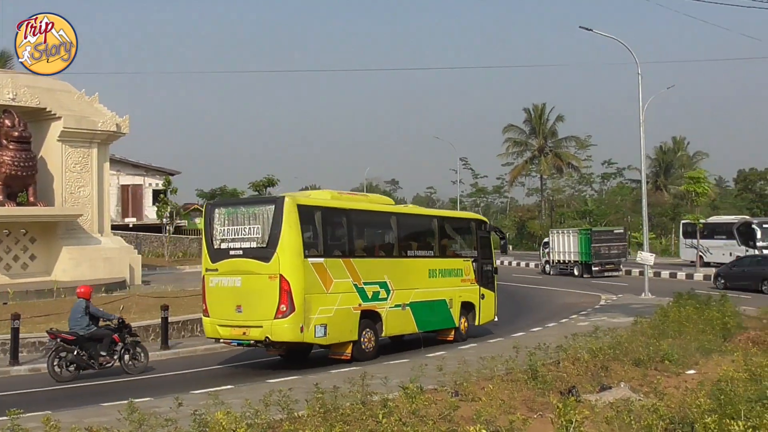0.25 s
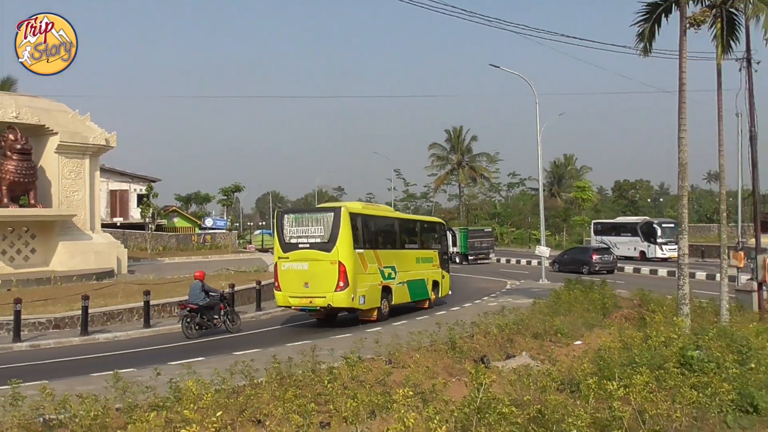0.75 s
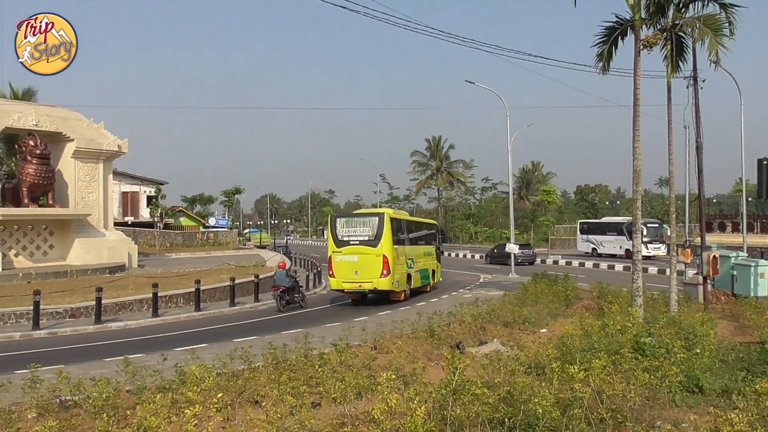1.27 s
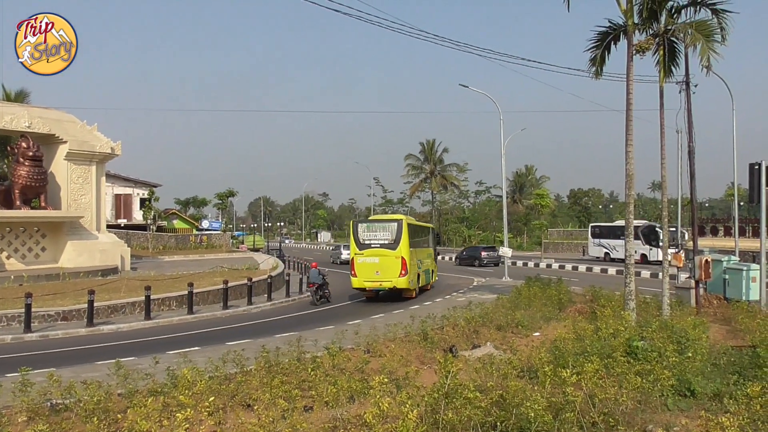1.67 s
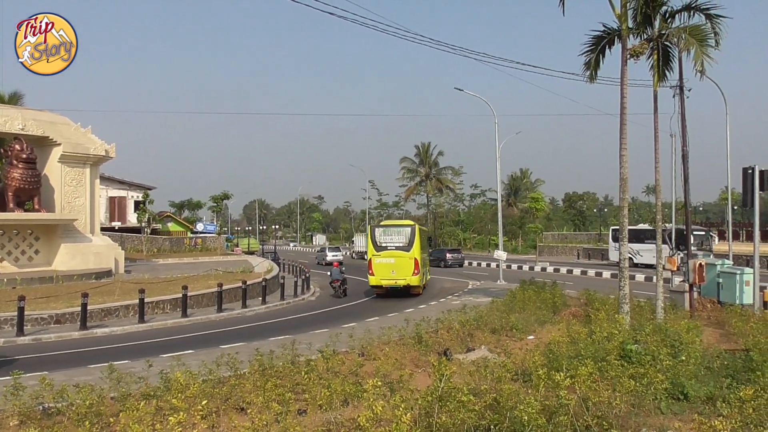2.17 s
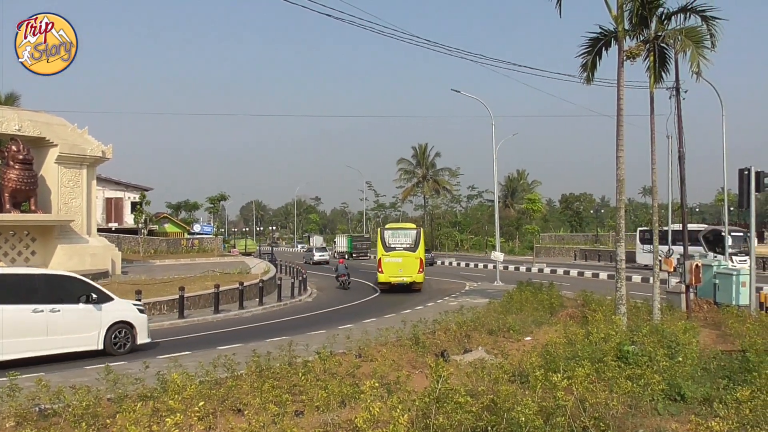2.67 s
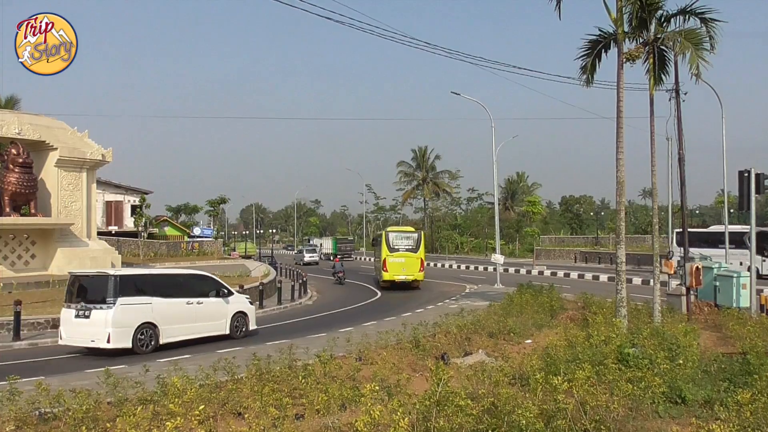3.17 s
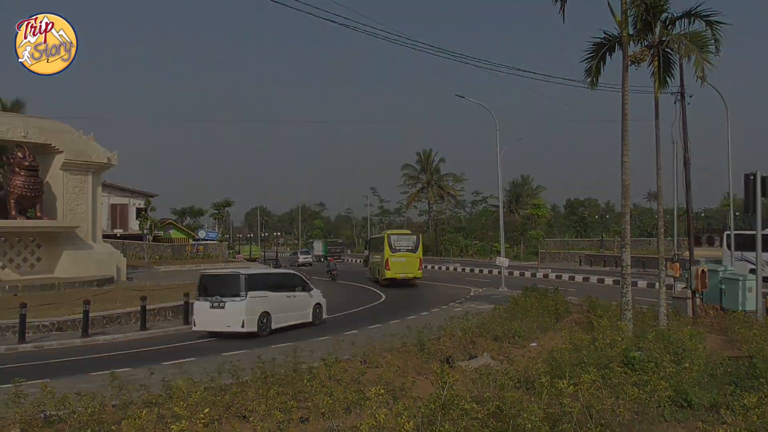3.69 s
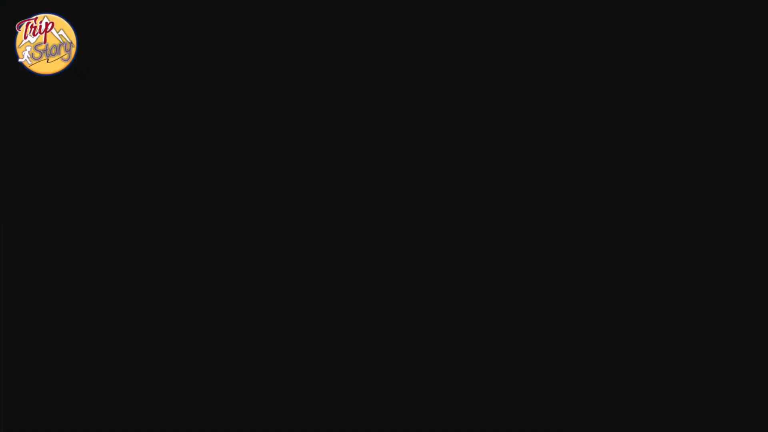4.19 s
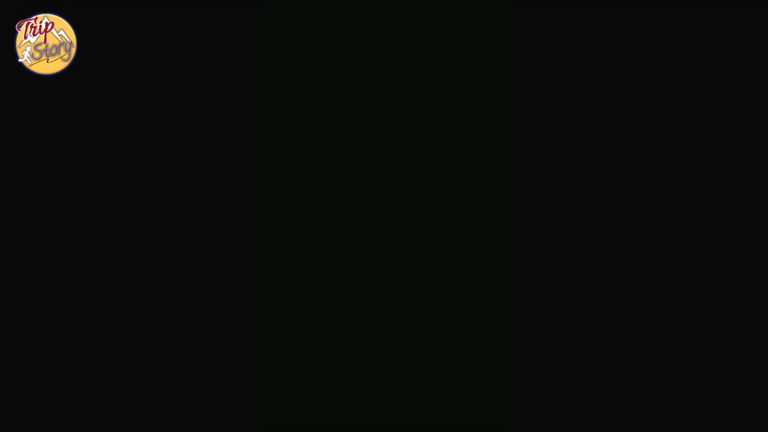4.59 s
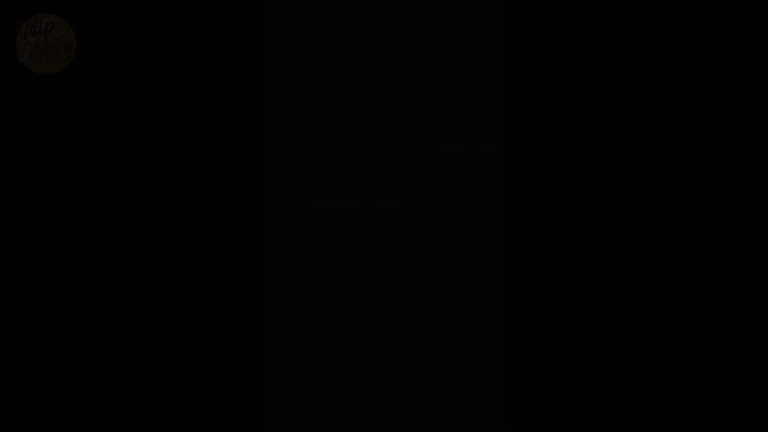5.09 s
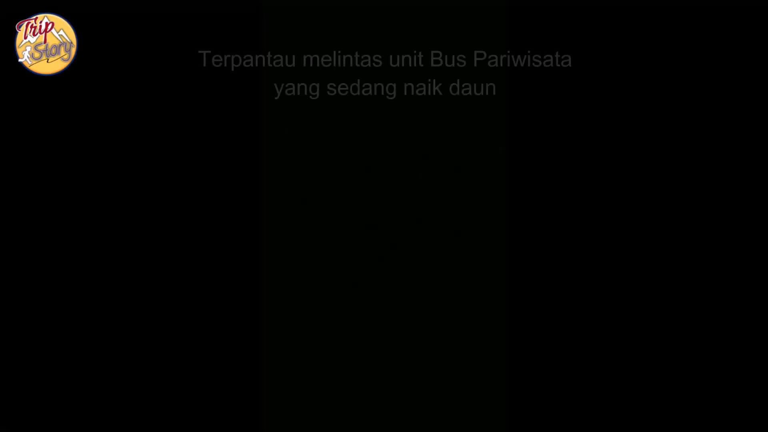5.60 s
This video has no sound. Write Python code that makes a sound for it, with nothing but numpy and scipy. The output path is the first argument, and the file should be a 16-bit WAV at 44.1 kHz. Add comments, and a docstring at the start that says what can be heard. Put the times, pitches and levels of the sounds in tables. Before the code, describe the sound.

At a roadside junction, a diesel bus pulls away in a steady roar of tyres and distant engines. Its gears whine, its cooling air hisses, an exhaust growl sinks and loose metal chinks lightly. A second diesel then speeds up close by while a shrill hiss swells and pulses. Another engine hums and a vehicle approaches before everything fades to silence. The traffic spreads in stereo.

```python
"""A diesel bus pulls away round a junction in a steady roar of tyres, far engines and air.
Its gears whine and its cooling air hisses; an exhaust growl sinks and small metal parts chink.
From 2 s a second diesel speeds up close by, while a shrill hiss swells and then pulses.
Another engine hums, a vehicle draws near, and from 4.8 s everything fades to silence."""
import sys
import numpy as np
from scipy import signal
from scipy.fft import rfft, irfft, next_fast_len
from scipy.io import wavfile
from scipy.ndimage import uniform_filter1d, map_coordinates

SR = 44100
rng = np.random.default_rng(int(sys.argv[2]) if len(sys.argv) > 2 else 0)


def master_out(mix):
    """Clip the mix to full scale and print it as 16-bit PCM to the path in sys.argv[1]."""
    frames = np.transpose(np.atleast_2d(mix))
    ceiling = np.clip(frames, -1, 1)
    pcm = np.round(ceiling * 32767).astype(np.int16)
    wavfile.write(sys.argv[1], SR, pcm)


N = 257981
TIME_S = np.arange(N) / SR


def amp(db):
    """Gain of a level in dB."""
    return 10 ** (np.asarray(db) / 20)


def along(points, hz):
    """(Hz, value) points interpolated on a log axis."""
    knots_hz, values = np.transpose(points)
    return np.interp(np.log(hz + 1), np.log(knots_hz + 1), values)


def curves(rows):
    """Each column after the time, per sample; end values hold."""
    knots_s, *columns = np.transpose(rows)
    return [np.interp(TIME_S, knots_s, column) for column in columns]


def during(rows, ease_s):
    """1 over a table's time span, with ramps outside it."""
    return np.clip(np.minimum(TIME_S - rows[0][0], rows[-1][0] - TIME_S) / ease_s + 1, 0, 1)


def bump(at_s, width_s):
    """Bell curve in time, peak 1."""
    return np.exp(-.5 * ((TIME_S - at_s) / width_s) ** 2)


def wobble(rate_hz):
    """Smooth random curve, rate_hz knots a second."""
    knots = rng.standard_normal(int(N * rate_hz / SR) + 4)
    return map_coordinates(knots, [TIME_S * rate_hz])


def filtered(x, response):
    """x through a frequency response."""
    size = next_fast_len(N + 8192)
    return irfft(rfft(x, size) * response(np.fft.rfftfreq(size, 1 / SR)), size)[..., :N]


def panned(x, pan_db):
    """Left louder than right by pan_db."""
    return x * amp(np.outer([.5, -.5], pan_db))


def phase_pair(lead_rad):
    """Stereo phasors, left ahead by lead_rad."""
    return np.exp(1j * np.outer([.5, -.5], lead_rad))


def shifted(pair, lead_rad, shift_hz=0):
    """All frequencies moved by shift_hz, left ahead by lead_rad."""
    analytic = signal.hilbert(pair, next_fast_len(N))[:, :N]
    carrier = np.exp(2j * np.pi * np.cumsum(np.broadcast_to(shift_hz, N)) / SR)
    return np.real(analytic * carrier * phase_pair(lead_rad))


def rush(spectrum, coherence, patchy_db):
    """Stereo noise, mid rms 1, with random gain patches in time and frequency."""
    cells = signal.stft(rng.standard_normal((2, N)), nperseg=1024)[2]
    patches = uniform_filter1d(rng.standard_normal(cells.shape[1:]), size=5, axis=0)
    patches = uniform_filter1d(patches, size=8, axis=1)
    patches /= np.sqrt(np.mean(patches ** 2))
    pair = signal.istft(cells * amp(patchy_db * patches), nperseg=1024)[1][:, :N]

    def mid_side(hz):
        angle = np.arccos(along(coherence, hz)) / 2
        return amp(along(spectrum, hz)) * [np.cos(angle), np.sin(angle)]

    mid, side = filtered(pair, mid_side)
    return np.array([mid + side, mid - side]) / np.sqrt(np.mean(mid ** 2))


def tone(hz, db, blur_hz, waver_db):
    """Sine shaken in pitch and level by uneven running and moving air."""
    phase = 2 * np.pi * np.cumsum(hz + blur_hz * wobble(25)) / SR
    return np.sqrt(2) * amp(db + waver_db * wobble(18)) * np.sin(phase)


def exhaust(rows, orders_db, blur_hz, waver_db):
    """Exhaust tones at multiples of a rate; rows are (time [s], rate [Hz], level [dB])."""
    hz, db = curves(rows)
    tones = (tone(k * hz, db + order_db, k * blur_hz, waver_db)
             for k, order_db in enumerate(orders_db, 1))
    return during(rows, ease_s=.19) * sum(tones)


def bus_lift_db(start_db, decay_s=1.2):
    """Extra level that decays as the bus leaves, plus slow random swells."""
    return start_db * np.exp(-TIME_S / decay_s) + .5 * wobble(5)


# Left-right likeness of the low roar (frequency [Hz], coherence [0..1])
ROAR_COHERENCE = [(60, 0.99), (130, 0.99), (290, 0.91), (640, 0.8), (1410, 0.35), (3100, 0.24),
                  (6820, 0.15), (15000, 0.25)]
# Rumble spectrum (frequency [Hz], relative density [dB])
RUMBLE_SPECTRUM = [(53, -33.5), (90, -8), (167, 0.5), (230, 0), (307, -0.5), (480, -9), (620, -34),
                   (1060, -120)]
# Rumble swell (time [s], gain [dB])
RUMBLE_GAIN = [(0, 0.5), (1.5, 1.5), (2.2, -1), (3.3, 0), (4.3, 1.5), (4.7, -2), (5.2, -0.5)]
def rumble(level_db=-21.5):
    """Far engines; their firing makes the noise lumpy."""
    gain = amp(level_db + curves(RUMBLE_GAIN)[0] + .53 * wobble(45))
    return gain * rush(RUMBLE_SPECTRUM, ROAR_COHERENCE, patchy_db=.5)


# Tyre spectrum (frequency [Hz], relative density [dB])
TYRE_SPECTRUM = [(250, -27), (420, -3), (472, -3.5), (587, 0), (679, -0.5), (961, -7), (1330, -10),
                 (1800, -22.5), (2340, -48), (3960, -120)]
# Tyre direction (time [s], left lead [rad])
TYRE_LEAD = [(0, 0.65), (.9, 0.9), (1.4, -0.22), (2.2, -0.51), (3.8, -0.12), (4.3, -0.2)]
def tyres(level_db=-26):
    """Tyre roar crossing the scene."""
    gain = amp(level_db + bus_lift_db(3) + .36 * wobble(40))
    return gain * shifted(rush(TYRE_SPECTRUM, ROAR_COHERENCE, patchy_db=.5), curves(TYRE_LEAD)[0])


# Road hiss spectrum (frequency [Hz], relative density [dB])
ROAD_SPECTRUM = [(1000, -5.5), (1700, -11.5), (1800, -5), (2170, 1), (2680, -6.5), (3870, -6.5),
                 (6200, -17), (8060, -39), (13600, -120)]
def road_hiss(level_db=-42.5, lull_db=-1.5):
    """Road hiss, sinking between the bus and the second diesel."""
    db = level_db + bus_lift_db(1.5) + lull_db * bump(at_s=1.7, width_s=.4) + .62 * wobble(15)
    return amp(db) * rush(ROAD_SPECTRUM, [(2000, .32), (5000, .28)], patchy_db=.76)


# Air fizz spectrum (frequency [Hz], relative density [dB])
FIZZ_SPECTRUM = [(3410, -25.5), (5800, -3), (10100, 0), (13100, -15), (15500, -20.5)]
def air_fizz(level_db=-51):
    """High fizz of air, louder while the bus is close."""
    coherence = [(7000, .3), (9000, .13), (10500, .29), (12500, .5), (15000, .35)]
    gain = amp(level_db + bus_lift_db(4.5) + .3 * wobble(13))
    return gain * rush(FIZZ_SPECTRUM, coherence, patchy_db=1)


# Cooling air envelope (time [s], level [dB])
COOLING_LEVEL = [(0, -56), (.8, -45), (2, -65)]
# Cooling air spectrum (frequency [Hz], relative density [dB])
COOLING_SPECTRUM = [(1900, -24), (2600, 0), (3300, 0), (4200, -1), (5000, -6), (5700, -22), (8000, -120)]
def cooling_air():
    """The bus's cooling air hisses up and recedes."""
    return amp(curves(COOLING_LEVEL)[0]) * rush(COOLING_SPECTRUM, [(4000, .45)], patchy_db=2.5)


# Roar balance (frequency [Hz], left minus right [dB])
ROAR_PAN = [(60, 3), (110, -1), (200, -0.5), (380, -1), (700, 0.5), (1290, -0.5), (2380, -1.5),
            (4400, -1.5), (8120, 3.5), (15000, -2)]
# Roar phase (frequency [Hz], left lead [rad])
ROAR_LEAD = [(300, 0), (6000, -.1), (7400, -.9), (8500, -2.8), (9500, -3.2), (10500, -4.6), (11500, -6.1),
             (15500, -6.2)]
def roar(dip_db=-2):
    """Five noise layers, spread in stereo by frequency; the level dips briefly."""
    layers = rumble() + tyres() + road_hiss() + air_fizz() + cooling_air()
    layers *= amp(dip_db * bump(at_s=4.54, width_s=.05))
    return filtered(layers, lambda hz: panned(phase_pair(along(ROAR_LEAD, hz)), along(ROAR_PAN, hz)))


# Thrum spectrum (frequency [Hz], relative density [dB])
THRUM_SPECTRUM = [(25, -31), (45, -16), (60, 3), (85, 2), (110, -12), (160, -39), (300, -120)]
def thrum(level_db=-36.5):
    """Deep wavering noise under the roar."""
    return amp(level_db + 1.8 * wobble(8)) * rush(THRUM_SPECTRUM, ROAR_COHERENCE, patchy_db=-.1)


# Bus exhaust orders 1 to 7 (level [dB])
BUS_ORDERS_DB = [-120, -40, -36.5, -32, -32.5, -36, -34]
def bus(start_hz=43.85, rise_hz_per_s=1.8, end_s=1.3):
    """The bus engine's beat quickens slightly as it draws away."""
    run = [(0, start_hz, 0), (end_s, start_hz + rise_hz_per_s * end_s, 0)]
    return exhaust(run, BUS_ORDERS_DB, blur_hz=.5, waver_db=3)


# Gear whine following road speed (time [s], pitch [Hz], level [dB])
GEAR_WHINE = [(0, 588, -32), (.8, 598, -31.5), (1.5, 581.6, -33.5), (2.0, 574.3, -29), (2.15, 593, -38),
              (2.38, 619, -31.5), (2.6, 662, -27.5), (3.0, 728, -35), (3.4, 742, -32), (3.6, 755.6, -37.5),
              (4.4, 757.6, -42.5), (4.7, 764, -29.5), (4.9, 754, -37)]
# Other vehicles' whines (start [s], length [s], first pitch [Hz], last pitch [Hz], level [dB])
SHORT_WHINES = [(0.399, .45, 669, 662, -32.5), (3.898, .45, 415, 398.4, -33)]
def gear_whines(clear_db=-28, blur_hz_per_db=.38):
    """Gear teeth sing one tone per vehicle; the weaker it is, the more its pitch blurs."""
    short_runs = [[(start_s, first_hz, db), (start_s + length_s, last_hz, db)]
                  for start_s, length_s, first_hz, last_hz, db in SHORT_WHINES]
    out = np.zeros(N)
    for run in [GEAR_WHINE] + short_runs:
        hz, db = curves(run)
        blur_hz = 3.5 + blur_hz_per_db * (clear_db - db)
        out += during(run, ease_s=.12) * tone(hz, db, blur_hz, waver_db=3.6)
    return np.array([out, np.roll(out, -2)])  # right 2 samples early


# Exhaust growl (time [s], pitch [Hz], level [dB])
GROWL_RUN = [(.95, 340, -39.5), (1.15, 305, -24), (1.55, 212, -29.5), (1.8, 178, -39.5)]
def growl():
    """A rough exhaust tone sinks as the throttle closes."""
    return exhaust(GROWL_RUN, [0], blur_hz=14, waver_db=2.2)


# Metal chinks (start [s], level [dB], pitch [Hz], length [s])
CHINK_HITS = [(1.104, -43, 10500, .035), (1.108, -56.5, 14400, .03), (1.16, -46, 10400, .018),
              (1.292, -49.5, 10400, .012), (1.42, -44.5, 8700, .012), (1.43, -42.5, 9290, .028),
              (1.525, -49, 9250, .012), (1.675, -50, 10400, 0.022), (1.95, -51, 10400, .032),
              (2.015, -54, 10400, .02)]
# Chink position (time [s], left minus right [dB])
CHINK_BALANCE = [(1.45, 9), (2, 0)]
def chinks():
    """Short thin rings of loose metal, moving from left to centre."""
    out = np.zeros(N)
    for start_s, db, hz, length_s in CHINK_HITS:
        t = np.arange(round(length_s * SR)) / SR
        envelope = amp(db) * np.sqrt(np.sin(np.pi * t / length_s))
        out[round(start_s * SR):][:len(t)] += envelope * np.sin(2 * np.pi * hz * t)
    return panned(out, curves(CHINK_BALANCE)[0])


# Shrill hiss (time [s], upper band level [dB], upper band shift [Hz], left minus right [dB])
HISS_RUN = [(1.85, -60, 49.5, 0), (2.0, -50, 51.5, 1), (2.6, -48.5, 55, 2.5), (2.95, -42.5, 57.5, 3),
            (3.35, -44.5, -100, 2), (3.7, -44, -62.5, -3.5), (4.0, -41.5, -180, 0.5),
            (4.25, -36.5, -120, 1), (4.38, -36.5, -61.5, 1.5), (4.47, -32, -28, 0), (4.62, -36.5, 21, 0),
            (4.76, -35.5, 61, 1.5), (4.9, -39, 80.5, 0), (5.2, -39, 80, 0)]
# Upper band (frequency [Hz], relative density [dB])
UPPER_SPECTRUM = [(6600, -45.5), (7150, -12.5), (7400, -1.5), (7650, 4), (7900, -1), (8250, -11),
                  (9000, -20.5), (10500, -41), (11600, -23.5), (12400, -39), (14000, -120)]
# Lower band (frequency [Hz], relative density [dB])
LOWER_SPECTRUM = [(5800, -50.5), (6550, -14.5), (6850, -2), (7050, 2.5), (7350, -3.5), (7700, -19.5),
                  (8500, -59)]
# Upper band direction (time [s], left lead [rad])
HISS_LEAD = [(1.85, -1.5), (2.9, -2), (3.4, -3), (4.1, -2), (4.5, -0.5)]
def shrill_hiss(puff_hz=66, puff_depth=.24, puff_from_db=-41, flutter_db=1.4):
    """Hiss in two close bands; when loud, both flutter and the upper comes in fast puffs."""
    upper_db, shift_hz, pan_db = curves(HISS_RUN)
    lead_rad, = curves(HISS_LEAD)
    excess_db = upper_db - puff_from_db
    drive = np.clip(excess_db / excess_db.max(), 0, 1)
    puff_phase = 2 * np.pi * np.cumsum(puff_hz * (1 + .08 * wobble(14))) / SR
    puffs = 1 + puff_depth * drive * np.cos(puff_phase)
    puffs /= np.sqrt(uniform_filter1d(puffs ** 2, size=SR // 10))  # constant power
    upper_gain = puffs * amp(upper_db + .6 * wobble(10) + flutter_db * drive * wobble(30))
    upper = shifted(rush(UPPER_SPECTRUM, [(7000, .62)], patchy_db=-1.5), lead_rad, shift_hz)
    lower_db = -51.5 + .43 * excess_db + 5 * bump(at_s=3.98, width_s=.3)
    lower_gain = amp(lower_db + .9 * wobble(12) + flutter_db * drive * wobble(30.1))
    lower = shifted(rush(LOWER_SPECTRUM, [(7000, .59)], patchy_db=2), lead_rad / 2)
    return during(HISS_RUN, ease_s=.3) * panned(upper_gain * upper + lower_gain * lower, pan_db)


# Near diesel (time [s], firing rate [Hz], level [dB])
DIESEL_RUN = [(2.1, 49.7, -42), (2.75, 52.5, -35), (3.55, 61.54, -32), (4.05, 68.7, -30.5),
              (4.45, 74.7, -36), (5.1, 80.7, -31.5)]
# Its orders 1 and 2 (level re firing tone [dB])
DIESEL_ORDERS_DB = [0, -0.86]
def near_diesel():
    """Firing tone and octave climb as the second diesel speeds up."""
    return exhaust(DIESEL_RUN, DIESEL_ORDERS_DB, blur_hz=.35, waver_db=.5)


# Engine hum (time [s], pitch [Hz], level [dB])
HUM_RUN = [(3.4, 120, -41), (4.0, 136.6, -32.5), (4.9, 124.7, -33.5)]
def engine_hum():
    """Another engine's tone rises and sags."""
    return exhaust(HUM_RUN, [0], blur_hz=1.5, waver_db=2.5)


# Approach envelope (time [s], level [dB])
APPROACH_LEVEL = [(3.8, -48), (4.4, -38.5), (4.7, -32), (5.0, -29.5), (5.2, -28.5)]
# Approach spectrum (frequency [Hz], relative density [dB])
APPROACH_SPECTRUM = [(400, -42), (750, -5.5), (900, 5), (1050, -16), (1330, 0), (1750, -18), (2160, -14.5),
                     (2700, -23), (4000, -28.5), (8000, -27.5), (13000, -35.5), (15500, -53.5)]
def approaching_vehicle():
    """Tyre and air noise coming straight on, faint until 3.8 s."""
    coherence = [(700, .96), (1400, .94), (8000, .5), (12500, .9)]
    gain = amp(curves(APPROACH_LEVEL)[0] + .8 * wobble(30))
    return gain * rush(APPROACH_SPECTRUM, coherence, patchy_db=-1)


def scene():
    """Stereo mix; engine tones sit near the centre."""
    engines = panned(bus() + near_diesel() + growl() + engine_hum(), pan_db=-.5)
    return engines + thrum() + roar() + approaching_vehicle() + gear_whines() + shrill_hiss() + chinks()


# Fade-out (time [s], gain [linear])
FADE_GAIN = [(4.84, 1), (5.225, 0.037)]
def record(dry, cutoff_hz=15620):
    """Linear fade, low-pass, then silence."""
    end_s = FADE_GAIN[-1][0]
    faded = dry * curves(FADE_GAIN)[0] * (TIME_S < end_s)
    return filtered(faded, lambda hz: hz < cutoff_hz) * (TIME_S < end_s + .01)


dry = scene()
out = record(dry)
master_out(out)
```